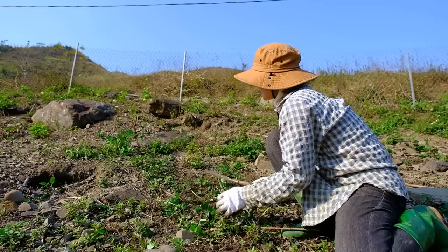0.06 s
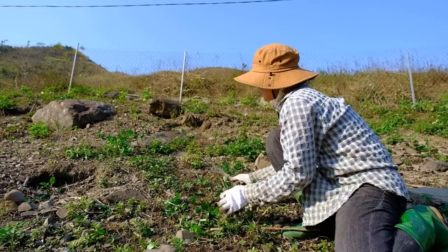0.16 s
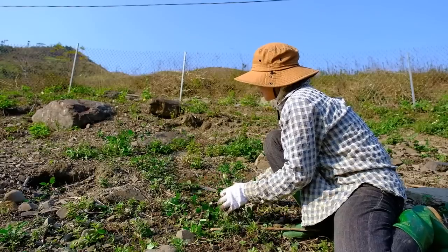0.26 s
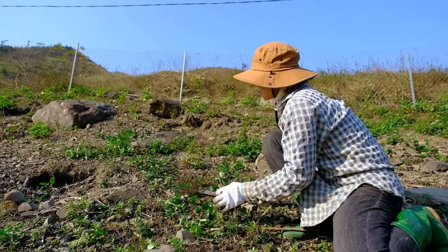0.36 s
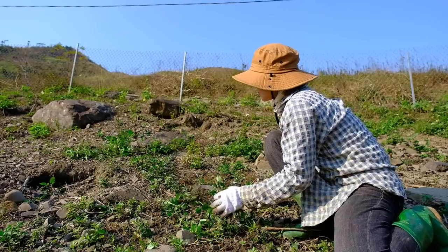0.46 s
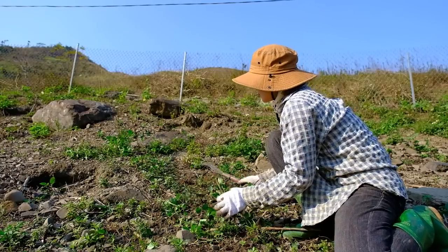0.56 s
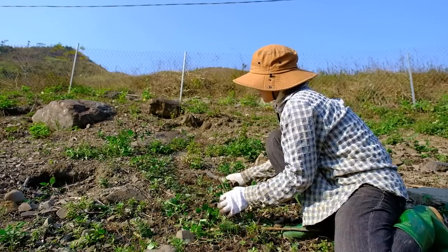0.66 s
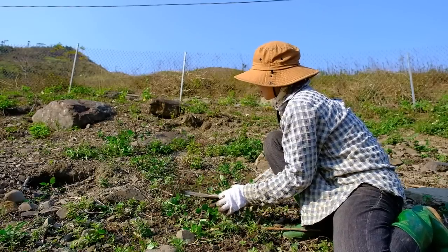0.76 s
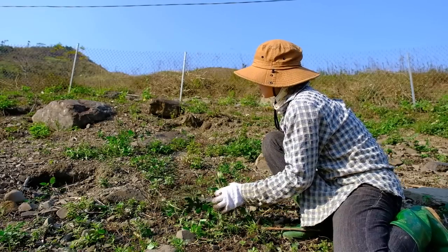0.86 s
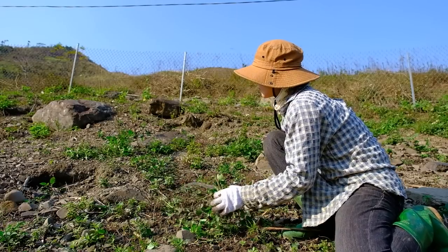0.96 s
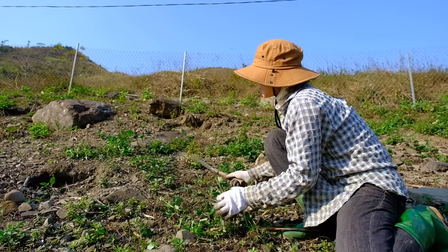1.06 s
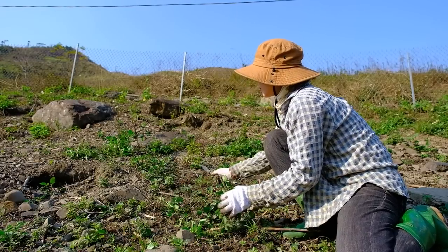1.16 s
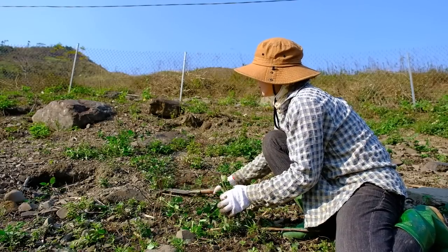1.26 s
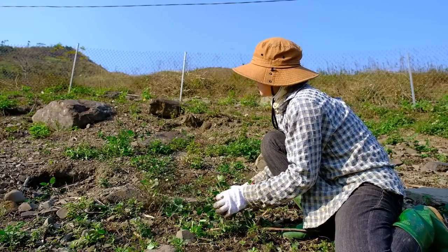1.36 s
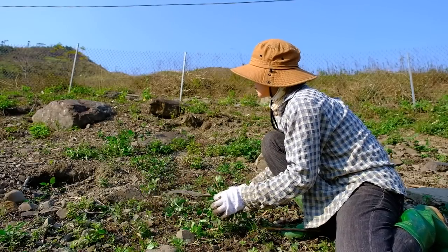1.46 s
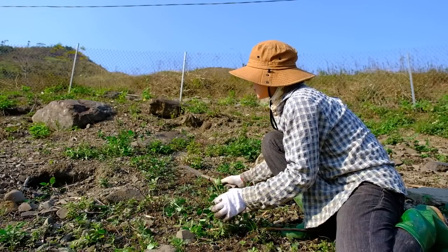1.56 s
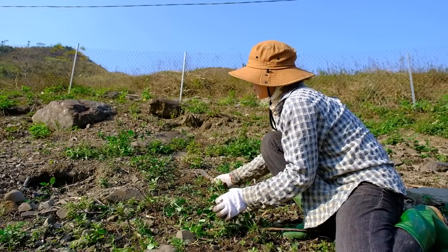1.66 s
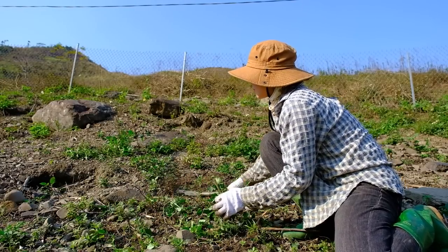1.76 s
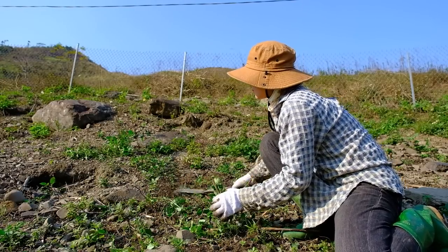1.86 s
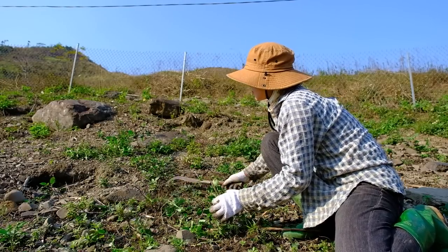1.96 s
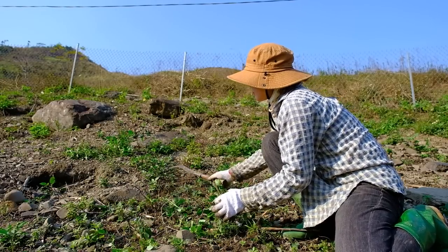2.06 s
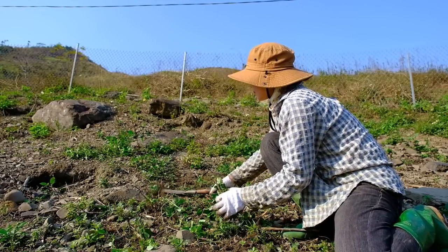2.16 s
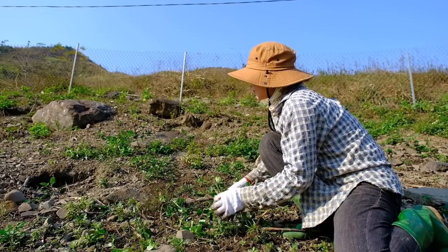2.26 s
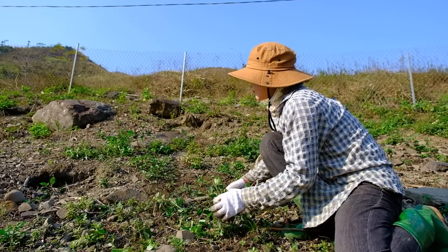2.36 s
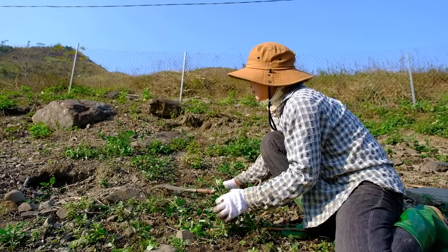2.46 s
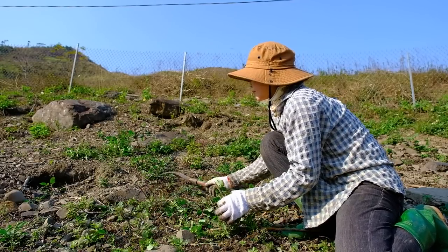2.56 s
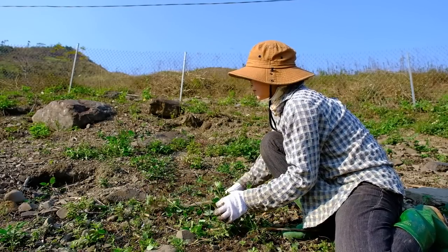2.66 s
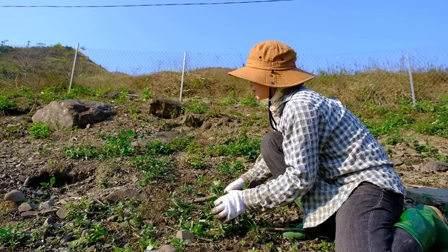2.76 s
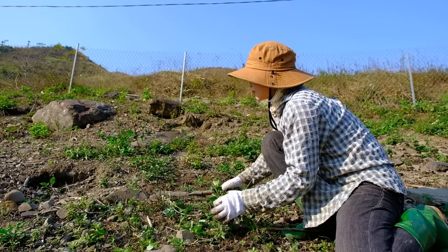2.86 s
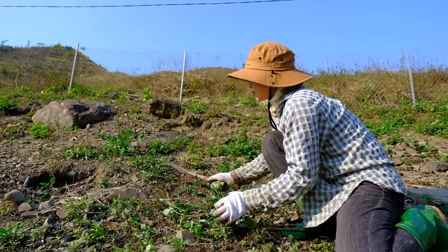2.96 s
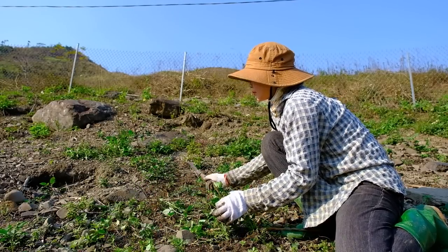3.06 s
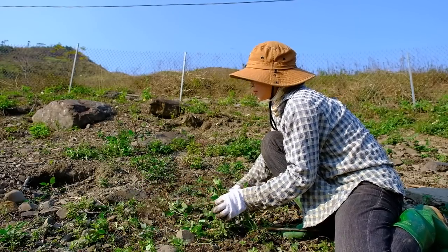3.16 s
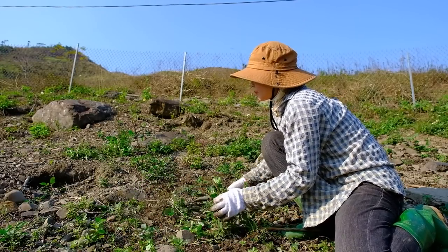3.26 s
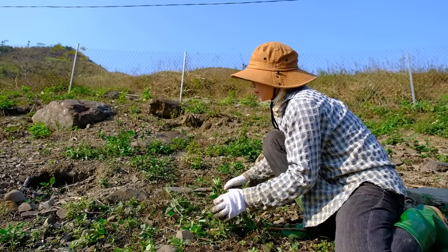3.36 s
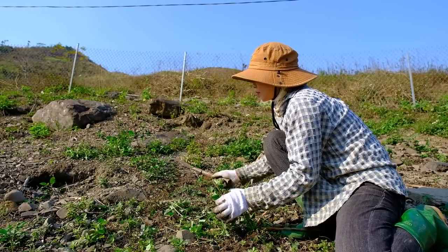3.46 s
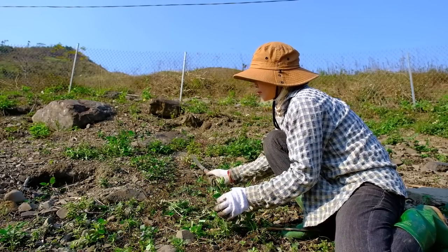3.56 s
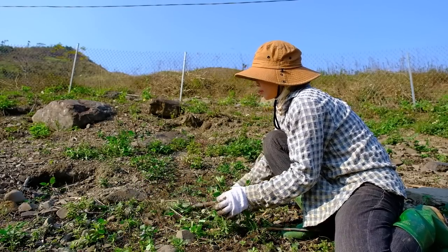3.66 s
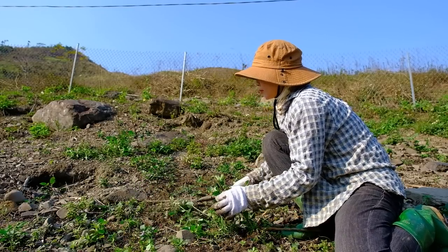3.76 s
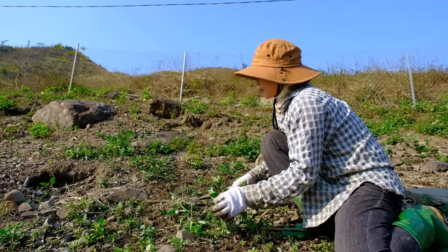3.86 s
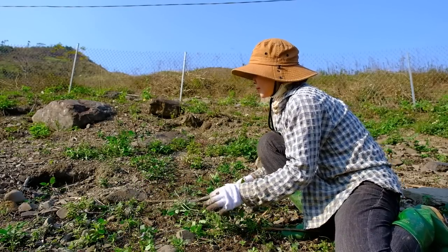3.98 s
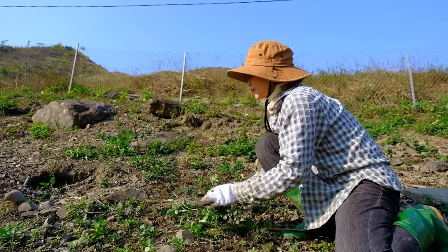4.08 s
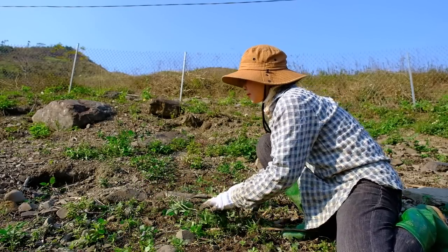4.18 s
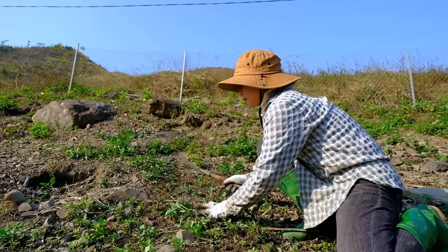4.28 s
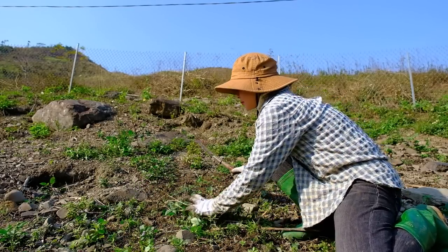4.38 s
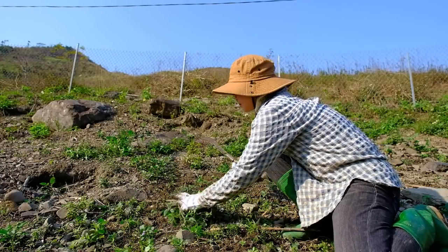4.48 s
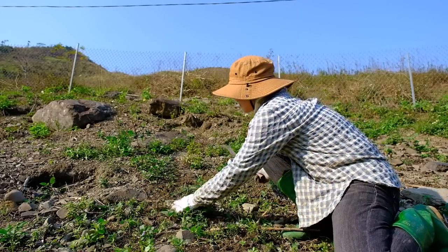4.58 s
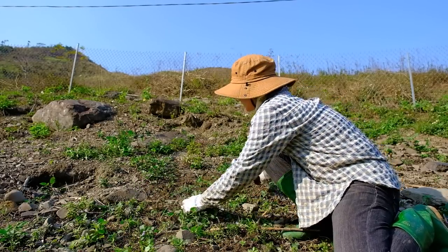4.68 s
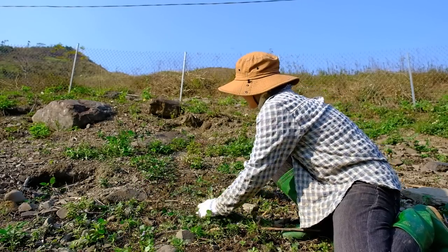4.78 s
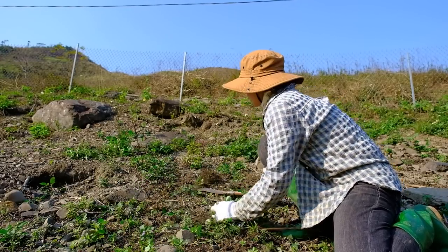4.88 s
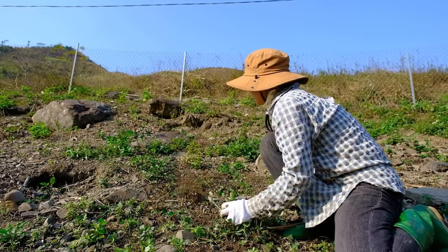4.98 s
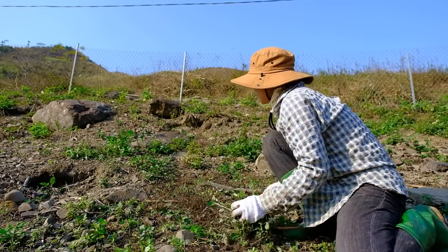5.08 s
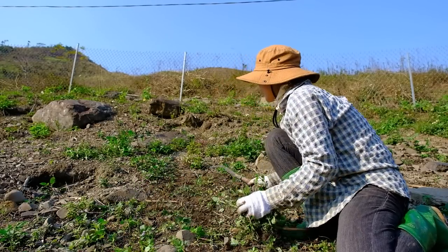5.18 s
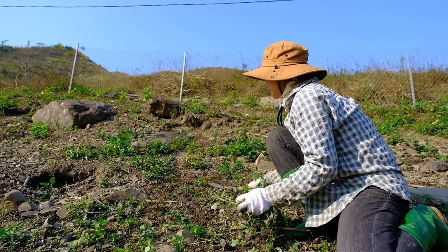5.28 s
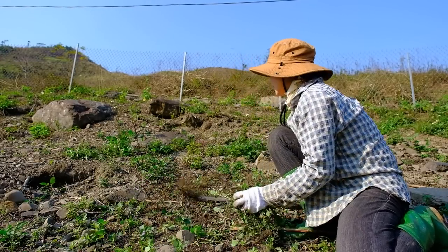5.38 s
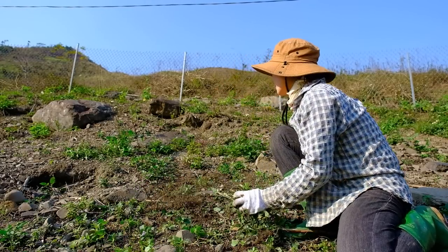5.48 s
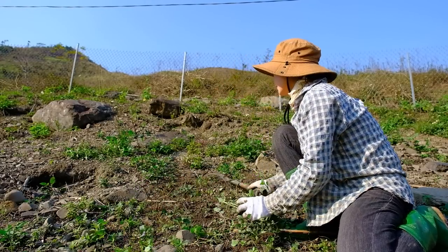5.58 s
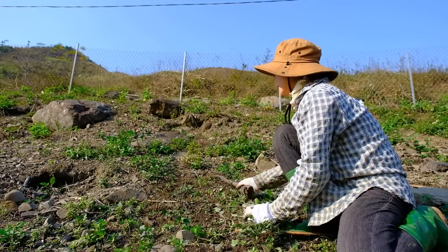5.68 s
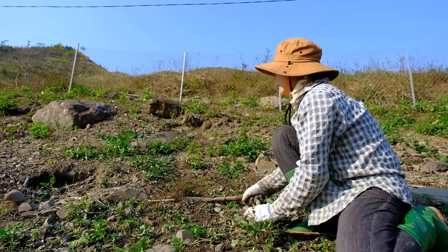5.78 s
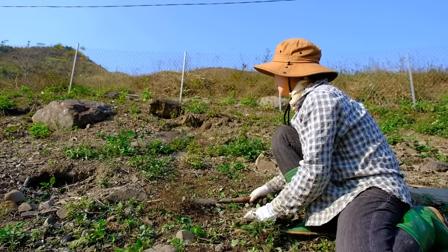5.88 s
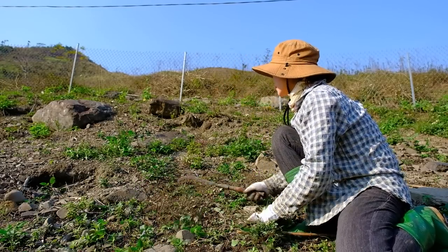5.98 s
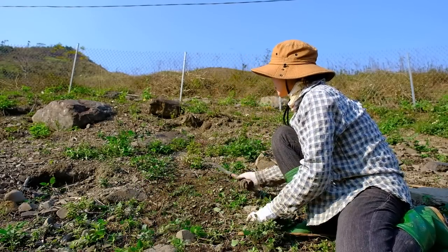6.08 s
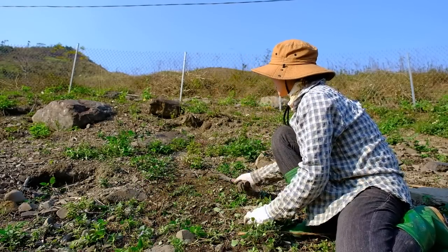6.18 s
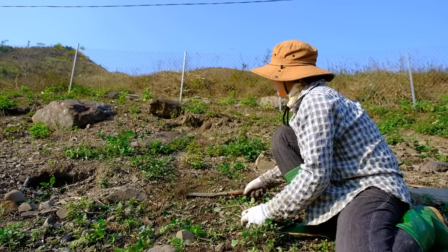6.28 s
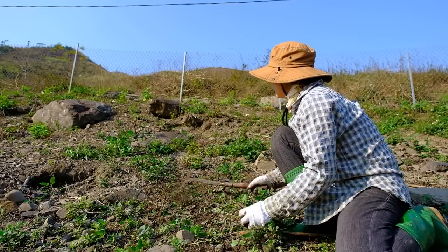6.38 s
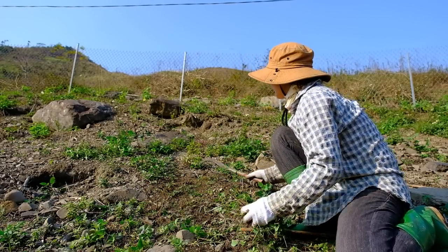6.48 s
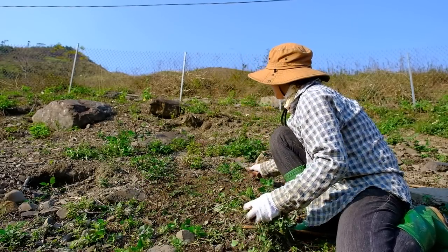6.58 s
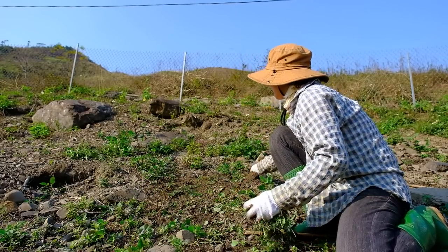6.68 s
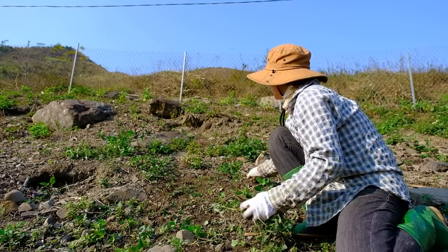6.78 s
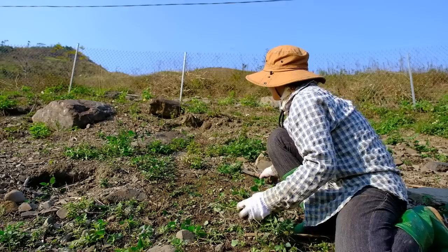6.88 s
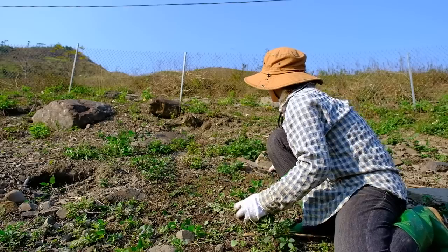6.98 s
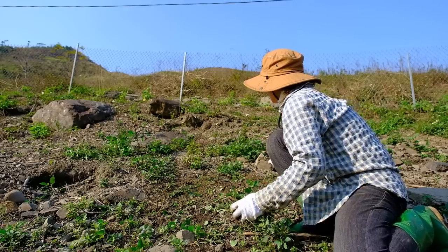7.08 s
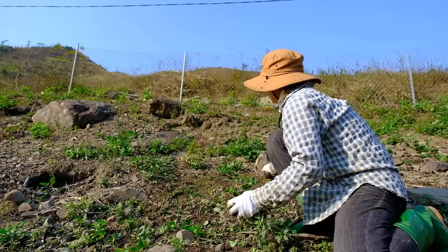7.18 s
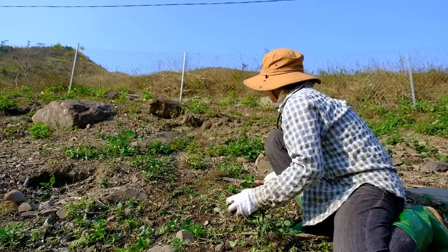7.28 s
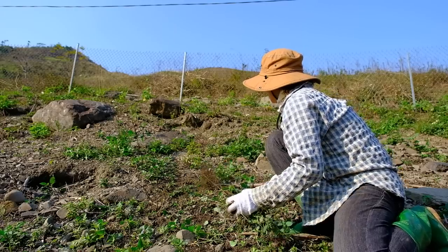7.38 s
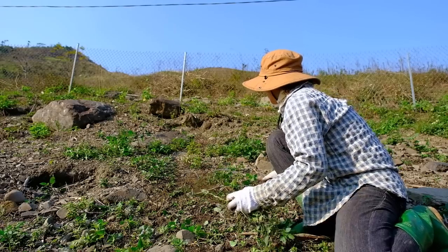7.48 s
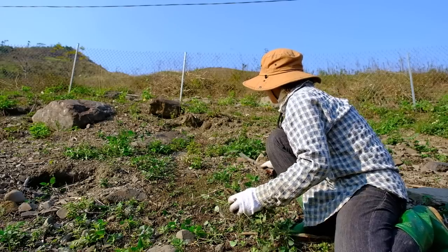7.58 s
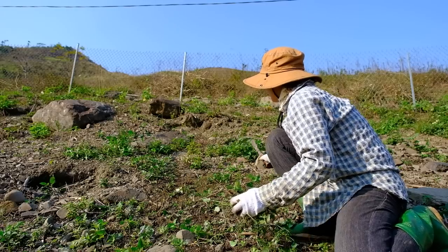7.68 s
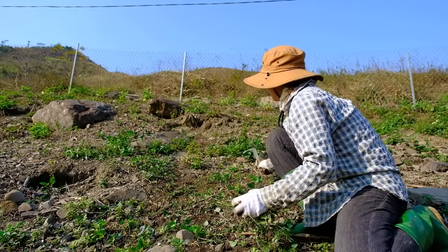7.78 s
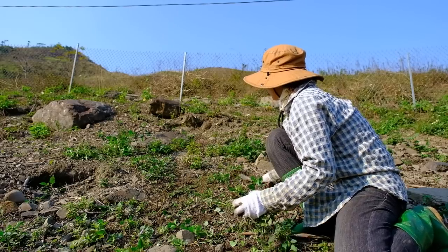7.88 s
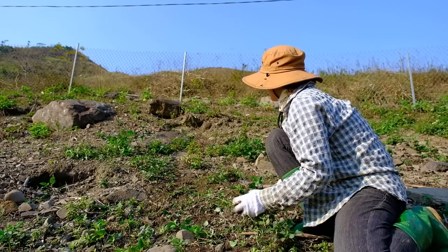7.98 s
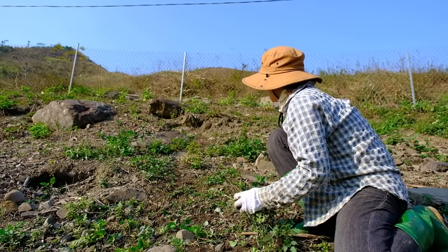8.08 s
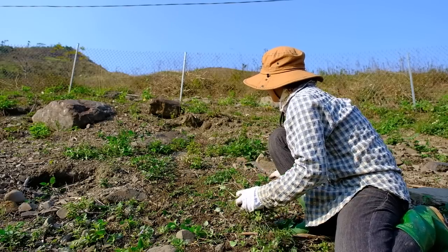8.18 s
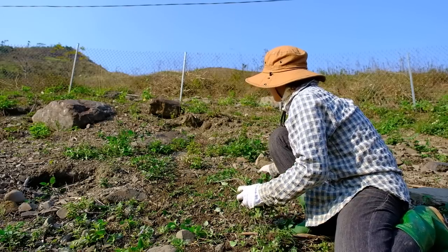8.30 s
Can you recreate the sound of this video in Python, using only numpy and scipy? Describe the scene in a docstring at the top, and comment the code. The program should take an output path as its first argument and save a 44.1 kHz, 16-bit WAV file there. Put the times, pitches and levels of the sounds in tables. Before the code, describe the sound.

Very close to the microphone outdoors, a small steel blade cuts weeds from dry, stony ground. Roughly two strokes a second crunch and crack against stones with short metallic rings, separated by soft leaf and grit rustles. Small clods thud. Around four seconds the strokes pause, leaving rustle and thin distant chirps, then the chopping resumes until eight seconds. Wind rumbles throughout and gusts at the end.

```python
"""A steel hand blade cuts weeds in dry stony soil, close to the microphone, from the first rustle of leaves and grit.
From 0.26 s it chops and drags roughly twice a second: enveloped noise grains crunch, and stones crack as gritty
bursts that ring the blade's decaying sine modes, clearest when it is raised. Clods thud, grazes sing, and a metal
part tinks near 0.6 and 8.3 s. Sine chirps pipe up from 2.6 to 4.8 s; strokes pause until 4.9 s, then go on to 8 s.
Filtered noise gives wind rumble, hiss and a distant drone throughout, with a strong gust near the end; peaks clip."""
import sys
import numpy as np
from scipy import signal
from scipy.fft import rfft, irfft, next_fast_len
from scipy.io import wavfile
from scipy.ndimage import uniform_filter1d

SR = 44100
rng = np.random.default_rng(int(sys.argv[2]) if len(sys.argv) > 2 else 0)


def pcm_store(signal):
    """Save signal as 16-bit PCM."""
    levels = np.round(np.clip(np.atleast_2d(signal), -1, 1) * 32767)
    wavfile.write(sys.argv[1], SR, levels.astype(np.int16).T)


N = 367794
T = np.arange(N) / SR   # time in seconds
BODY_HZ, TREBLE_HZ = 2000, 7000   # edges between body, middle and treble

# Ringing modes of the steel blade. Each row: pitch in Hz, level in dB, time to fall 60 dB at freedom 1 in seconds.
BLADE_MODES = [(646, -17, .2), (1320, -2, .15), (1776, -6, .2), (2360, -8, .1), (3005, -4, .15),
               (3305, -8, .15), (4150, -6, .1), (4400, -6, .1), (5380, -6, .12), (5720, -1, .09),
               (7050, -10, .07), (8130, -11, .05), (9140, -12, .05), (10900, -12, .05), (11850, -10, .05),
               (13300, -10, .05)]
# Colour of stony soil crushed by the blade. Each row: frequency in Hz, relative level in dB per Hz.
CRUNCH_SPECTRUM = [(88, -50), (150, -24), (702, -21.5), (1310, -6.5), (1900, -13), (2980, -2), (4490, -1.5),
                   (4860, -1.5), (5790, 1), (6640, -8.5), (10200, -9.5), (13400, -5.5), (16000, -17)]


def amp(db):
    """dB to gain."""
    return 10 ** (np.asarray(db) / 20)


def rms_one(x):
    """Scale to rms 1."""
    return x / np.sqrt(np.mean(x ** 2) + 1e-20)


def colour(x, spectrum):
    """Shape by a spectrum of (Hz, dB), joined along a log frequency axis; rms 1."""
    hz, level_db = np.transpose(spectrum)
    size = next_fast_len(len(x))
    grid = np.maximum(np.arange(size // 2 + 1) * SR / size, 1)
    gain = amp(np.interp(np.log(grid), np.log(hz), level_db))
    return rms_one(irfft(rfft(x, size) * gain, size)[:len(x)])


def split(x):
    """Body, middle and treble parts that add up to about the whole."""
    def cut(edge, kind):
        return signal.sosfilt(signal.butter(3, edge, kind, fs=SR, output="sos"), x)
    return cut(BODY_HZ, "low"), cut([BODY_HZ, TREBLE_HZ], "band"), cut(TREBLE_HZ, "high")


def resonate(x, hz, sharpness):
    """Let through one resonance; a higher sharpness makes it narrower."""
    return signal.lfilter(*signal.iirpeak(hz, sharpness, SR), x)


def drift(rate):
    """Smooth random wander of rms 1, slower for a lower rate in Hz."""
    r = np.exp(-2 * np.pi * rate / SR)
    wander = signal.lfilter([1], [1, -2 * r, r * r], rng.standard_normal(N + SR))
    return rms_one(wander[SR:])   # the first second lets the filter settle


def grains(per_s, spread_db, grain_s):
    """Tiny bursts of noise at random moments, few large and many small; rms 1."""
    happens = rng.random(N) < per_s / SR
    sizes = amp(spread_db * np.minimum(rng.exponential(1, N), 5)) * happens
    fade = np.exp(-1 / (grain_s * SR))
    envelope = signal.lfilter([1], [1, -fade], sizes + 1e-18)
    return rms_one(envelope * rng.standard_normal(N))


def window(s, length):
    """A gate with soft edges."""
    return np.clip(np.minimum(T - s, s + length - T) / 0.0037, 0, 1)


def blade(free, strengths_db, t):
    """Impulse response of the blade as a sum of decaying modes; soil around it shortens the ring."""
    hz, level_db, t60 = np.transpose(BLADE_MODES)[:, :, None]
    fall = amp(-60 * t / (t60 * np.clip(free, .05, 1.5)))
    return np.sum(amp(level_db + strengths_db) * fall * np.sin(2 * np.pi * hz * t), axis=0)


def cracks():
    """Each crack is a gritty burst that dies fast, a short note of the stone, and the blade's ring."""
    # The blade meets stone or root. Each row: start in seconds, level in dB, time for the burst to fall
    # 60 dB in seconds (held to 4-150 ms below), body in dB against the middle, loudest pitch in Hz.
    hits = [(0.041, -35, 0.038, -13, 4000), (0.2891, -5, 0.017, -7, 1400), (0.337, -26.5, 0.05, -11, 1350),
            (0.653, -32, 0.03, -15, 3000), (0.7493, -16, 0.1, -11, 5360), (0.759, -8.5, 0.053, -4, 12500),
            (0.7962, -1, 0.017, -17, 4440), (0.821, -21, 0.017, -21, 5810), (0.8266, -9, 0.026, -5, 5570),
            (0.838, -13, 0.034, -1, 5500), (0.8499, -8.5, 0.028, -3, 5300), (0.925, -35.5, 0.16, 1, 5530),
            (1.117, -28.5, 0.018, -26, 1020), (1.2703, -17.5, 0.085, -6, 5630),
            (1.285, -12.5, 0.04, -11, 5570), (1.3, -10.5, 0.12, -8, 2910), (1.322, -2, 0.055, -9.5, 5750),
            (1.336, -2, 0.047, -6, 5400), (1.39, -18, 0.011, -6, 15300), (1.4024, -26.5, 0.096, -7, 3320),
            (1.6766, -13, 0.017, -33, 5630), (1.709, -29, 0.026, -19, 5530),
            (1.753, -18, 0.084, -7.5, 3100), (1.7659, -22, 0.091, 3, 2930), (1.7957, -34, 0.032, -3, 1240),
            (1.816, -25, 0.075, 0, 14000), (1.9854, -24, 0.008, -20, 9100), (2.191, -7.5, 0.063, -12, 5800),
            (2.213, -9.5, 0.06, -2.5, 5670), (2.219, -10, 0.023, -8, 12100), (2.236, -10, 0.096, -2, 5400),
            (2.2535, 5.5, 0.0095, -3.5, 5150), (2.273, -16, 0.03, -1, 5210), (2.528, -25, 0.016, -2, 2890),
            (2.5965, -31, 0.028, -18, 2140), (2.6188, -27.5, 0.019, -11, 940), (2.7, -27, 0.02, -8, 5200),
            (2.704, 2.5, 0.042, -4.5, 5230), (3.079, -19.5, 0.016, -14, 11900),
            (3.1594, -28.5, 0.012, -17, 3470), (3.1968, 4.5, 0.067, -8, 11200),
            (3.2174, -18, 0.067, -10, 5860), (3.7196, -7, 0.036, -3.5, 5340),
            (3.7221, -1, 0.049, -7.5, 3470), (3.7576, -22.5, 0.016, -13, 5760),
            (4.8604, -20.5, 0.11, -7, 2750), (4.8702, -27, 0.14, -8, 12360), (4.9069, -5, 0.018, -39, 1800),
            (4.9177, -11.5, 0.077, -40, 2620), (4.9543, -17, 0.079, -3.5, 6200),
            (5.042, -24.5, 0.036, -9, 5500), (5.0527, -9.5, 0.014, -16, 10800),
            (5.246, -28, 0.012, -12, 9000), (5.284, -36, 0.011, -20, 5000),
            (5.3403, -7, 0.037, -10.5, 2690), (5.3693, -12, 0.054, -7, 13860), (5.377, -16, 0.09, -4, 5640),
            (5.4367, -24, 0.012, -1, 5160), (5.5303, -27, 0.01, -4, 3950),
            (5.6437, -29.5, 0.039, -17, 5300), (5.7361, -21.5, 0.0065, -6, 840),
            (5.7851, -8.5, 0.079, -5, 4350), (5.8005, -7.5, 0.11, -19, 5600), (5.829, -12, 0.1, -4, 5800),
            (5.859, -17, 0.047, -6.5, 5670), (6.274, -19.5, 0.088, -15, 2420),
            (6.2914, -7, 0.036, -11, 5140), (6.304, -24, 0.055, -4, 5740), (6.3474, -18.5, 0.05, -5, 1080),
            (6.483, -31, 0.041, -25, 5300), (6.598, -20.5, 0.008, -27, 4860),
            (6.7922, -18, 0.037, -35, 8100), (6.806, -19.5, 0.058, -19, 5100),
            (7.226, -31, 0.043, -16, 3120), (7.249, -0.5, 0.027, -34, 2030),
            (7.308, -9, 0.062, -2.5, 10800), (7.3175, -24, 0.042, -17, 4120),
            (7.3424, -9.5, 0.082, -7, 5400), (7.358, -13, 0.03, -17, 5130), (7.3946, -27, 0.086, -13, 5240),
            (7.7436, -13.5, 0.028, -20, 2370), (7.7537, -9, 0.039, -19, 6050),
            (7.7686, -14.5, 0.034, -17, 3750), (7.776, -22.5, 0.09, -2.5, 4760),
            (7.801, -24.5, 0.14, 0, 4200), (7.816, 7, 0.026, -11, 4330), (7.8415, -11.5, 0.024, -5, 960),
            (7.8774, -16, 0.067, -10, 10100), (7.8857, -11.5, 0.048, -12, 11400),
            (7.9302, -27, 0.074, 4, 2390), (7.9493, -27, 0.046, 5.5, 1330),
            (7.9676, -19, 0.048, 2.5, 12100), (7.9918, -35.5, 0.04, 14.5, 2300),
            (8.0344, -26, 0.043, -31, 2430), (8.107, -31.5, 0.089, -21, 11600),
            (8.14, -26.5, 0.021, -14, 880), (8.2846, -33.5, 0.17, -29, 5030)]
    hard_freedom, light_freedom, light_below_db = 0.25, 0.35, -16.5   # a light touch leaves the blade freer (0-1)
    snap_db, snap_s = -8, 0.00068   # the first contact is a brief extra snap
    treble_db, treble_db_per_octave = -1.5, 1   # a crack pitched above the treble edge is brighter, below it duller
    out, t = np.zeros(N + SR), T[:SR // 5]
    grit = np.pad(colour(grains(per_s=6000, spread_db=6.0, grain_s=0.00088), CRUNCH_SPECTRUM), (0, SR))
    parts = np.array([rms_one(part) for part in split(grit)])
    mode_hz = np.array(BLADE_MODES)[:, :1]
    chance_db = 3 * rng.standard_normal((len(hits), len(BLADE_MODES), 1))
    for (s, level_db, t60, body_db, hz), own_db in zip(hits, chance_db):
        hardness = np.clip((level_db - light_below_db) / 10, 0, 1)
        free = light_freedom + (hard_freedom - light_freedom) * hardness
        at = slice(round(s * SR), round(s * SR) + len(t))

        decay = amp(-60 * t / np.clip(t60, .004, .15))
        snap = amp(snap_db) * np.exp(-t / snap_s)
        fall = (decay + snap) * np.minimum(t / 0.00073, 1)
        stone = resonate(grit[at], min(hz, .45 * SR), 8.0)
        layers = fall * np.vstack([parts[:, at], stone])
        # the blow sets the energy of every layer
        layers *= np.sqrt(np.sum(fall ** 2) / np.sum(layers ** 2, axis=1, keepdims=True))
        own_treble_db = treble_db + treble_db_per_octave * np.log2(hz / TREBLE_HZ)
        burst = amp([body_db, 0, own_treble_db, -5]) @ layers   # body, middle, treble, stone

        # the struck spot picks its modes, those near the loudest pitch most
        favoured_db = own_db - 11.0 * np.minimum(abs(np.log2(mode_hz / hz)), 1.5)
        ring = np.clip(free, 0, 1.5) * blade(free, favoured_db, t) * np.minimum(t / 0.00039, 1)
        out[at] += amp(level_db) * (burst + amp(5.5) * ring)
    return out[:N]


def taps():
    """The raised blade knocks a stone or stem: a brief click, then every mode rings, less damped by soil."""
    # Each row: start in seconds, level in dB, blade freedom from 0 to 1, tilt of the modes in dB per octave.
    knocks = [(0.5227, -37.5, 0.7, 14), (1.4757, -12, 0.39, 7), (2.89, -24.5, 0.57, 7.5),
              (2.897, -36, 0.6, 10), (3.29, -32, 0.85, 2), (3.2983, -34, 0.66, 7), (3.465, -28.5, 0.5, 14),
              (3.637, -41.5, 0.4, 4), (4.2042, -29, 0.4, 6), (5.096, -30.5, 0.4, 2),
              (6.4304, -42.5, 0.2, 7), (7.2476, -13, 0.6, 0), (7.271, -20, 0.43, -5)]
    click_db, click_s = 8, 0.0015   # gain of the contact click beside the ring, and its decay time
    out, t = np.zeros(N + SR), T[:SR // 5]
    octaves = np.log2(np.array(BLADE_MODES)[:, :1] / 5000)
    modes = len(BLADE_MODES)
    chance = rng.standard_normal((len(knocks), modes + len(t)))
    for (s, level_db, free, tilt_db), own in zip(knocks, chance):
        ring = blade(free, 2.5 * own[:modes, None] + tilt_db * octaves, t)
        click = np.diff(own[modes:], prepend=0) * np.exp(-t / click_s)   # differencing brightens the noise
        out[round(s * SR):][:len(t)] += amp(level_db) * (ring + amp(click_db) * click)
    return out[:N]


def stirring():
    """Level and treble of the stirred ground in dB: the rustle, or a stroke wherever that is louder."""
    # Blade strokes through the soil. Each row: entry in seconds, digging time in seconds,
    # level as the digging ends in dB, fade after it in dB per second, treble in dB.
    strokes = [(0.259, 0.13, -28.5, 240, -4), (0.748, 0.016, -16.5, 105, -5.5),
               (1.271, 0.06, -15, 348, -1.5), (1.743, 0.02, -19.5, 254, -4),
               (2.187, 0.025, -16.5, 210, -0.5), (2.699, 0.021, -14.5, 648, -2),
               (3.195, 0.014, -3.5, 694, -18), (3.717, 0.012, -21, 450, -2), (4.855, 0.094, -23, 112, -2),
               (5.32, 0.071, -20.5, 550, -5), (5.761, 0.049, -20.5, 210, -1), (6.262, 0.045, -20, 342, -2),
               (6.778, 0.011, -25.5, 313, 8.5), (7.015, 0.032, -43, 152, 7.5),
               (7.105, 0.066, -41.5, 200, 6.5), (7.29, 0.052, -24, 253, 0.5), (7.742, 0.012, -20, 450, 6),
               (7.804, 0.042, -14.5, 268, -12), (7.875, 0.09, -23.5, 190, 0)]
    # Leaves and grit stirred by the hands between strokes. Each row: time in seconds, level in dB, treble in dB.
    rustle = [(0.0, -46.5, -1), (0.25, -46, -4), (0.46, -43.5, -4), (0.62, -44, -5), (0.72, -48, -6),
              (1.2, -42, -8), (1.73, -39.5, -1.5), (2.16, -47.5, -2.5), (2.34, -42, -3), (2.9, -45.5, -2),
              (3.14, -47, -6), (3.27, -41.5, -2.5), (3.67, -49, -4), (3.9, -51, -7.5), (4.36, -43.5, -4),
              (4.67, -47, -1), (4.85, -36, -4), (5.28, -40, -3), (5.48, -43.5, -3.5), (5.69, -39, -2),
              (6.25, -39.5, -3.5), (6.44, -45.5, -4), (6.77, -50, -2), (7.1, -41.5, 0), (7.44, -47.5, 1),
              (7.73, -40, -3.5), (8.08, -42, -7), (8.27, -54.5, -1), (8.34, -43.5, 0)]
    bite_db_per_s, dig_db_per_s = 2503, 40   # how fast the level jumps on entry, then swells while digging in
    lift_s, lift_db = 0.12, -2   # the rustle hushes as the blade is raised, until the digging ends
    t = T[::20]   # a coarse time grid is enough for envelopes
    s, level_db, treble_db = np.transpose(rustle)
    level_db, treble_db = np.interp(t, s, level_db), np.interp(t, s, treble_db)
    for enters, digs, peak_db, fade_db, own_treble_db in strokes:
        late = t - enters - digs
        level_db = level_db + lift_db * np.clip(1 + (t - enters) / lift_s, 0, 1) * (late < 0)
        bite_db = bite_db_per_s * (t - enters) - 54
        swell_fade_db = peak_db + np.where(late < 0, dig_db_per_s, -fade_db) * late
        stroke_db = np.minimum(swell_fade_db, bite_db)
        treble_db = np.where(stroke_db > level_db, own_treble_db, treble_db)
        level_db = np.maximum(level_db, stroke_db)
    return np.interp(T, t, level_db), np.interp(T, t, uniform_filter1d(treble_db, size=20))


def soil():
    """Gentle stirring is leaves brushing and grit ticking; hard dragging is dense crunch, partly through the steel."""
    # Colour of brushed leaves and loose grit. Each row: frequency in Hz, relative level in dB per Hz.
    leaf_spectrum = [(250, -26), (400, -2.5), (930, 9), (2000, -2.5), (3600, -2.5), (5700, -2),
                     (7200, -7.5), (12000, -8.5), (16000, -10.5)]
    drag_db = -36   # above this level the blade is in the ground
    level_db, treble_db = stirring()
    hard = np.clip((level_db - drag_db) / 10, 0, 1)

    grit = grains(per_s=900 * amp(4.4 * drift(40)), spread_db=3.5, grain_s=0.00075)
    steel = rms_one(signal.fftconvolve(grit, blade(0.35, 0, T[:SR // 10]))[:N])
    crunch = split(colour(grit, CRUNCH_SPECTRUM) + amp(-1.5) * steel)

    busy = amp(5 * drift(9))
    dull, bright, broad = (grains(per_s=120 * busy, spread_db=4.0, grain_s=0.00055) for _ in range(3))
    brushing = rng.standard_normal(N) * amp(3.1 * drift(31))
    # the treble ticks partly apart from the body and middle
    lower = colour(brushing + amp(-1.0) * dull + amp(-6) * broad, leaf_spectrum)
    upper = colour(brushing + amp(-0.5) * bright + amp(-0.5) * broad, leaf_spectrum)
    leaves = split(lower)[:2] + split(upper)[2:]

    body, middle, treble = (np.sqrt(hard) * rms_one(dragged) + np.sqrt(1 - hard) * rms_one(brushed)
                            for dragged, brushed in zip(crunch, leaves))
    return amp(level_db) * (amp(-11.5) * body + middle + amp(treble_db) * treble)


def grazes():
    """Light, uneven friction sings through one narrow resonance, with the free blade singing along."""
    # Each row: start in seconds, length in seconds, pitch in Hz, level in dB.
    touches = [(0.355, .07, 7150, -42), (6.429, 0.029, 7330, -38.5), (6.5, 0.11, 3620, -45),
               (7.017, 0.032, 4960, -43), (7.095, .085, 2900, -44.5), (7.445, 0.054, 7140, -43)]
    blade_db = -1   # the blade's modes against the narrow band
    friction = grains(per_s=600, spread_db=3, grain_s=.002)
    through_blade = signal.fftconvolve(friction, blade(0.8, 0, T[:SR // 10]))[:N + 1]
    singing = amp(blade_db) * rms_one(np.diff(through_blade))
    out = np.zeros(N)
    for s, length, hz, db in touches:
        narrow = rms_one(resonate(friction, hz, 24))
        out += amp(db) * window(s, length) * (narrow + singing)
    return out


def thuds():
    """A clod lands with one dull, quickly damped note, a shorter octave above it and a puff of crumbs."""
    # Clods dropping. Each row: start in seconds, level of the note in dB, pitch in Hz, time to fall 60 dB in seconds.
    clods = [(0.099, -12.5, 366, 0.0064), (0.941, -20, 950, 0.019), (1.046, -26.5, 720, 0.019),
             (3.032, -24, 925, 0.036), (6.189, -21.5, 860, 0.018), (7.246, -24.5, 316, 0.093)]
    crumble_db = -13.5   # the clod crumbles as it lands
    out, t = np.zeros(N + SR), T[:SR // 10]
    crumb_band = signal.butter(2, [600, 3500], "band", fs=SR, output="sos")
    crumbs = rms_one(signal.sosfilt(crumb_band, rng.standard_normal((len(clods), len(t)))))
    for (s, level_db, hz, t60), crumb in zip(clods, crumbs):
        fall = amp(-60 * t / t60)
        note = np.sin(2 * np.pi * hz * t) + 0.69 * fall * np.sin(2 * np.pi * 2.0 * hz * t)
        out[round(s * SR):][:len(t)] += amp(level_db) * fall * (note + amp(crumble_db) * crumb)
    return out[:N]


def tinks():
    """A small free metal part is tapped; every tap rings the same few decaying modes."""
    # Each row: start in seconds, gain on all modes in dB.
    small_taps = [(.598, -40), (8.287, -26.5)]
    # Modes of the small part. Each row: pitch in Hz, level in dB, time to fall 60 dB in seconds.
    part_modes = [(2750, -18, 0.9), (5820, 2, 0.19), (7020, -4, 0.098), (15000, -6, .16)]
    out, t = np.zeros(N + SR), T[:SR // 4]
    ring = sum(amp(level_db - 60 * t / t60) * np.sin(2 * np.pi * hz * t) for hz, level_db, t60 in part_modes)
    for s, gain_db in small_taps:
        out[round(s * SR):][:len(t)] += amp(gain_db) * ring
    return out[:N]


def chirps():
    """Thin, faint whistles far away: steady sine pitches whose loudness wavers."""
    # Each row: start in seconds, length in seconds, pitch in Hz, level in dB before the waver.
    whistles = [(2.555, .09, 7060, -50), (4.115, .06, 7040, -52), (4.325, .045, 7040, -55),
                (4.74, .03, 7300, -52)]
    notes = sum(amp(db) * window(s, length) * np.sin(2 * np.pi * hz * T) for s, length, hz, db in whistles)
    return amp(2 * drift(40)) * notes


def background():
    """Lumpy wind on the microphone, brighter in gusts; open-air hiss; a far drone in one broad resonance."""
    # Gusts, before the random lumps. Each row: time in seconds, rumble level in dB.
    gusts = [(0.0, -34), (0.28, -57), (0.41, -32.5), (0.62, -32), (1.11, -46.5), (1.64, -44.5),
             (1.85, -51.5), (2.3, -44.5), (2.45, -54.5), (3.24, -34.5), (3.46, -34), (3.58, -48),
             (3.77, -36), (4.46, -50.5), (4.94, -35.5), (5.42, -49.5), (5.77, -43), (6.39, -53),
             (6.69, -39), (7.04, -40), (7.19, -59.5), (7.39, -43), (7.97, -39.5), (8.17, -25.5),
             (8.34, -29)]
    # Colour of wind on the microphone. Each row: frequency in Hz, relative level in dB per Hz.
    rumble_spectrum = [(12, -46), (20, -3.5), (65, 4.5), (92, 5), (168, -6.5), (269, -17), (308, -23),
                       (474, -36), (500, -35), (650, -71), (1100, -120)]
    # Colour of the open air. Each row: frequency in Hz, relative level in dB per Hz.
    air_spectrum = [(88, -48), (150, 7.5), (383, 2), (716, -4.5), (941, 12.5), (1060, -7), (1560, -3.5),
                    (5680, -9.5), (7470, -58), (13700, -9.5), (16000, -37)]
    air_db, drone_db = -51, -52
    drone_hz, drone_width_hz = 915, 360
    gust_db = np.interp(T, *np.transpose(gusts))
    rumble = colour(rng.standard_normal(N), rumble_spectrum)
    flutter = signal.sosfilt(signal.butter(2, 130, "high", fs=SR, output="sos"), rumble)
    brightness = np.clip((gust_db + 42) / 15, -.5, 1)   # negative in lulls, where it dulls the rumble
    wind = amp(gust_db + 2.8 * drift(14)) * (rumble + brightness * flutter)
    hiss = amp(air_db) * colour(rng.standard_normal(N), air_spectrum)
    drone = rms_one(resonate(rng.standard_normal(N), drone_hz, drone_hz / drone_width_hz))
    return wind + hiss + amp(drone_db + drift(14.0)) * drone


def scene():
    """All sources at one microphone."""
    return (cracks() + taps() + soil() + grazes() + thuds() + tinks() + chirps() + background())[None]


def record(dry):
    """The recorder overloads: peaks clip at full scale, then a steep low-pass cuts the top."""
    cutoff_hz = 16500
    return signal.sosfilt(signal.cheby2(18, 60, cutoff_hz, fs=SR, output="sos"), np.clip(dry, -1, 1))


dry = scene()
out = record(dry)
pcm_store(out)
```